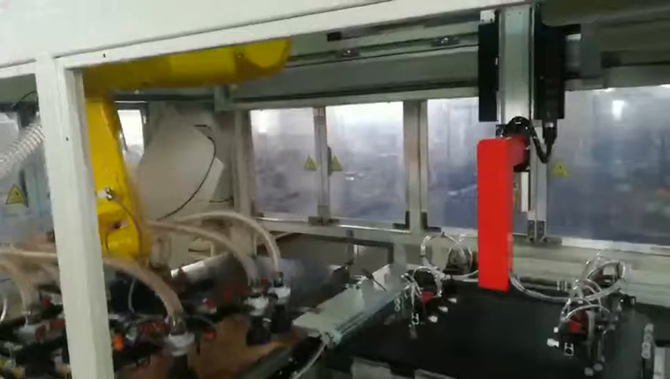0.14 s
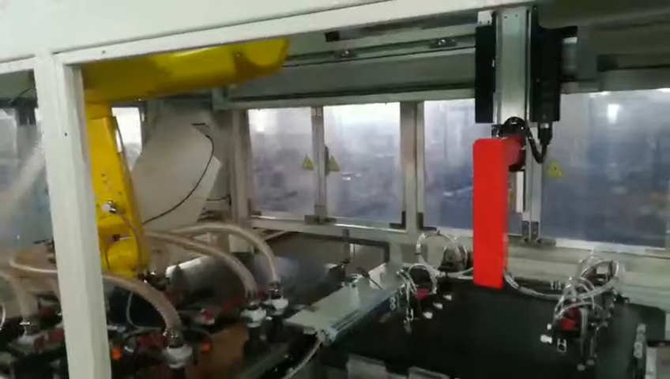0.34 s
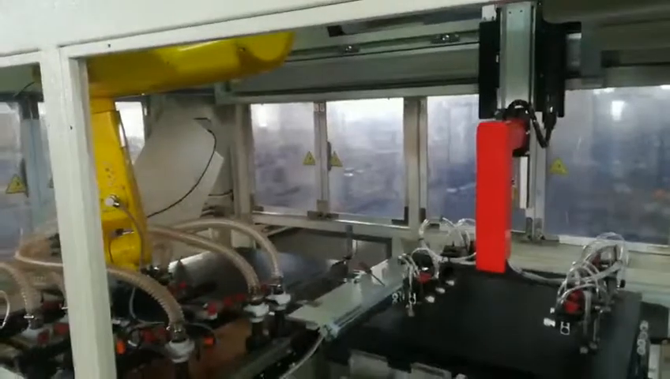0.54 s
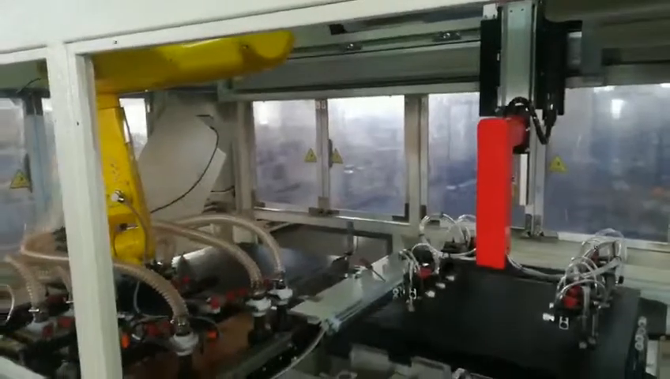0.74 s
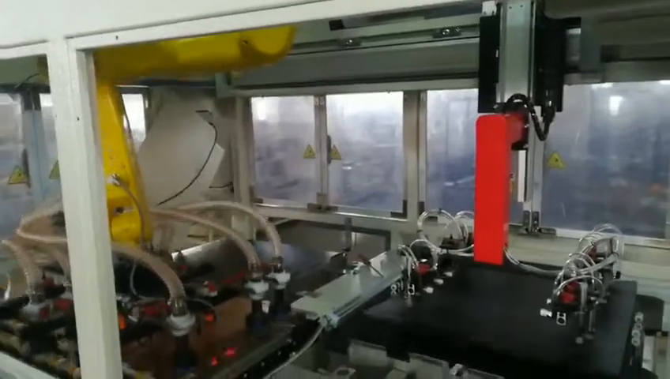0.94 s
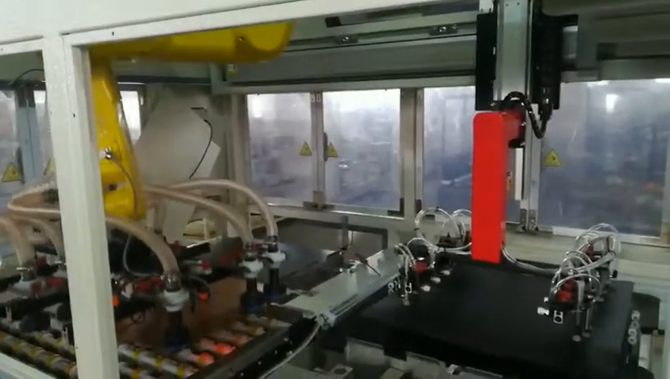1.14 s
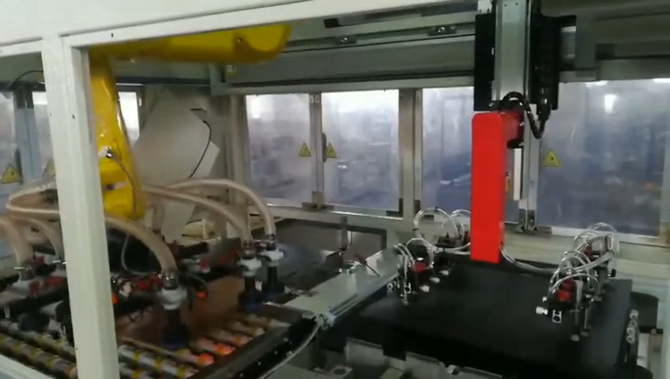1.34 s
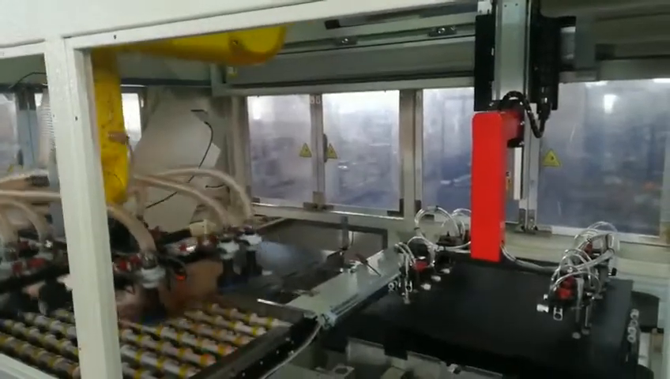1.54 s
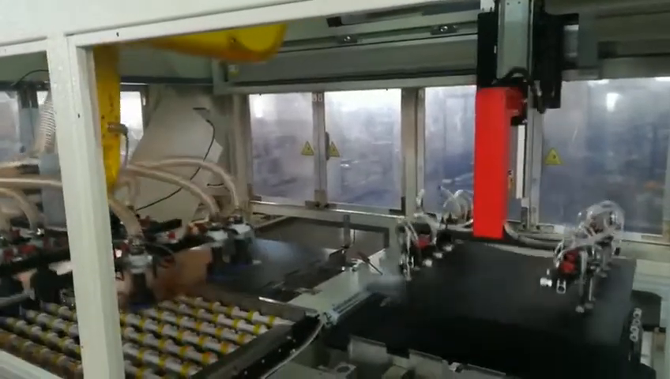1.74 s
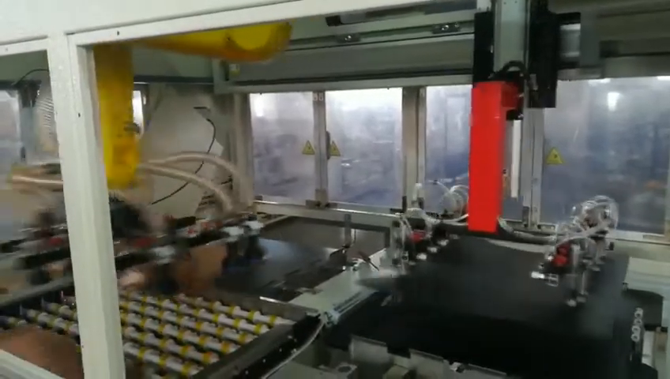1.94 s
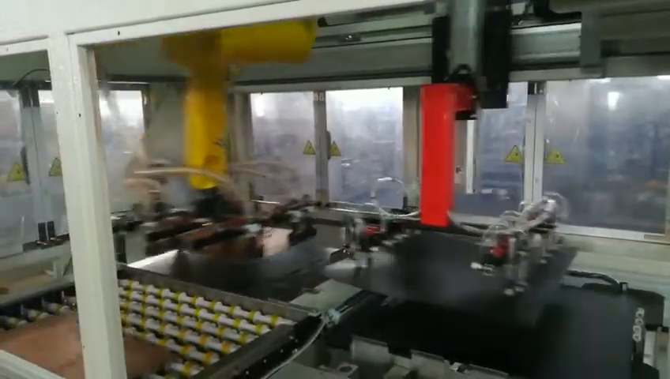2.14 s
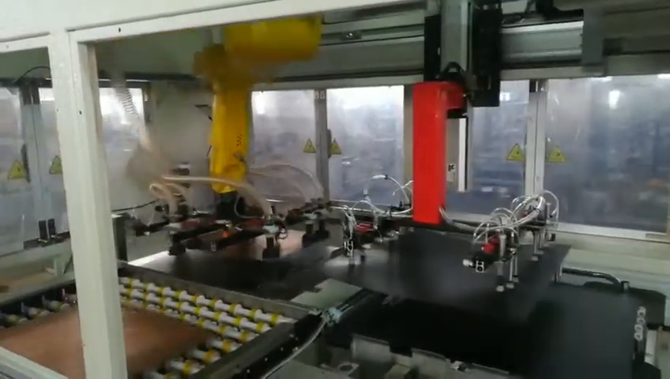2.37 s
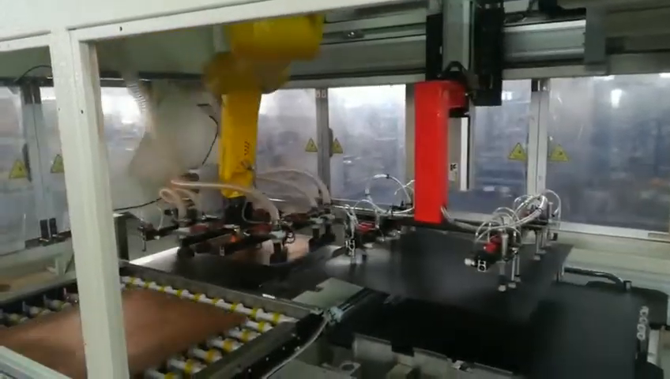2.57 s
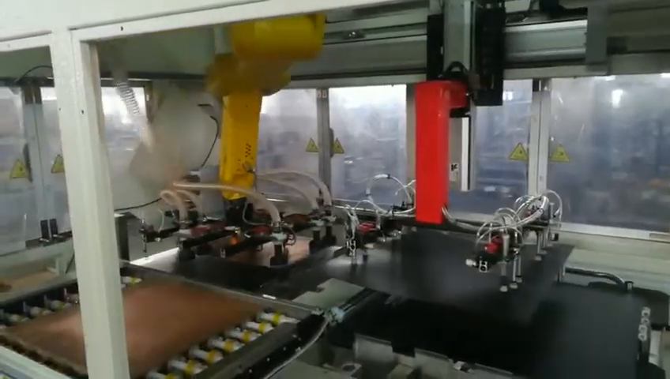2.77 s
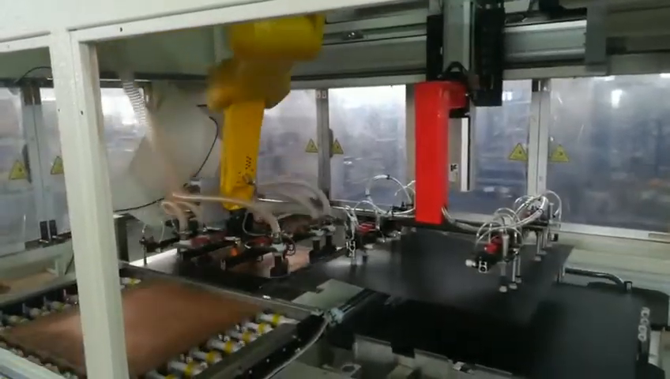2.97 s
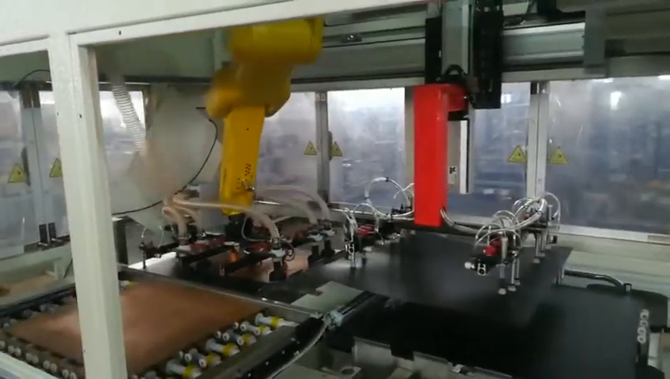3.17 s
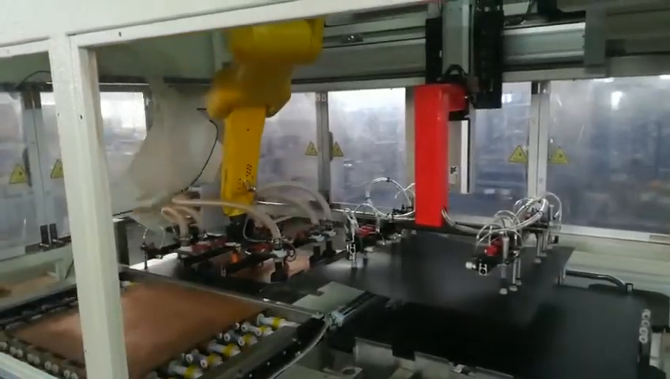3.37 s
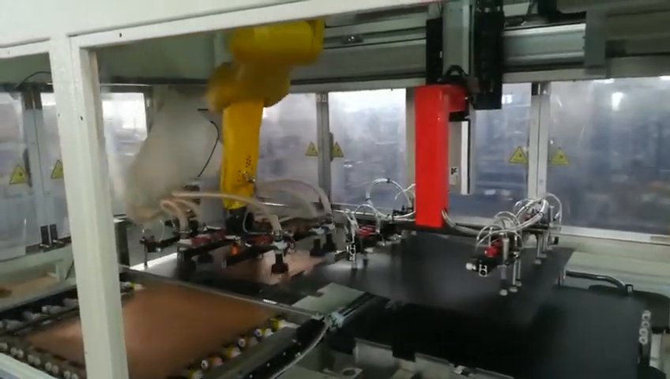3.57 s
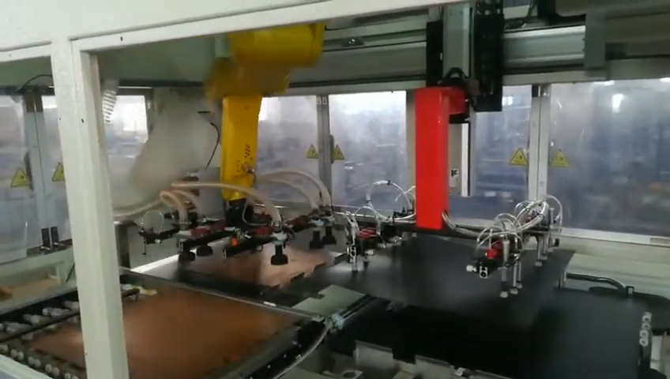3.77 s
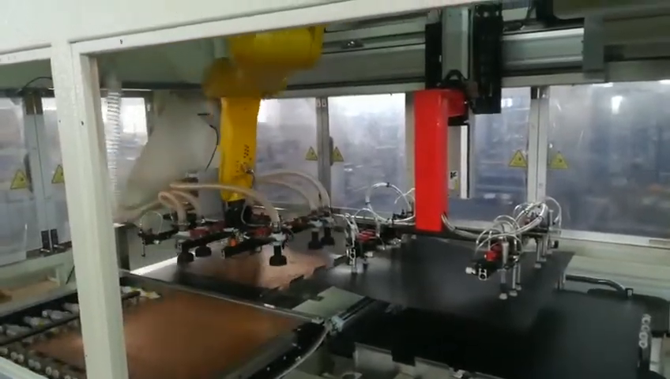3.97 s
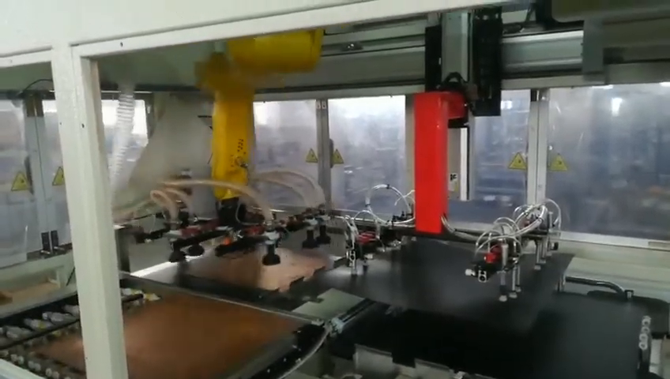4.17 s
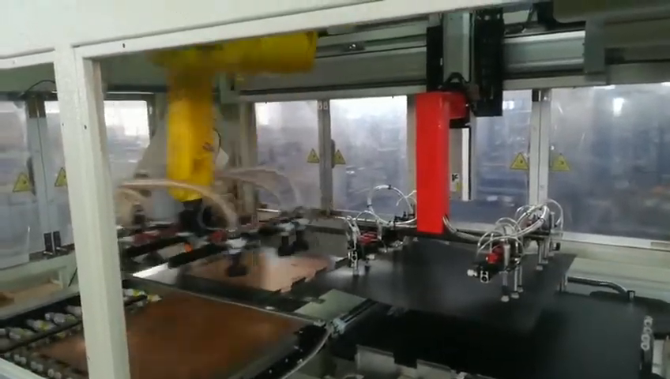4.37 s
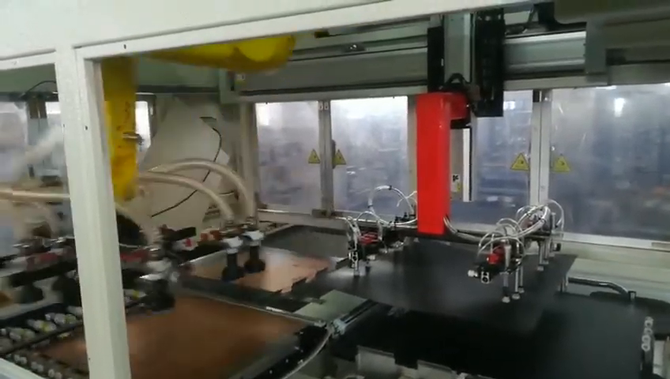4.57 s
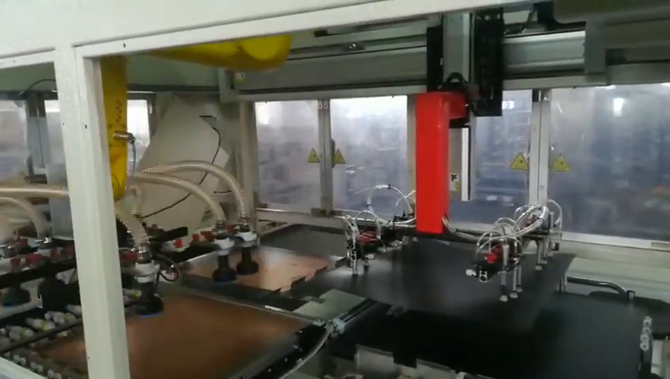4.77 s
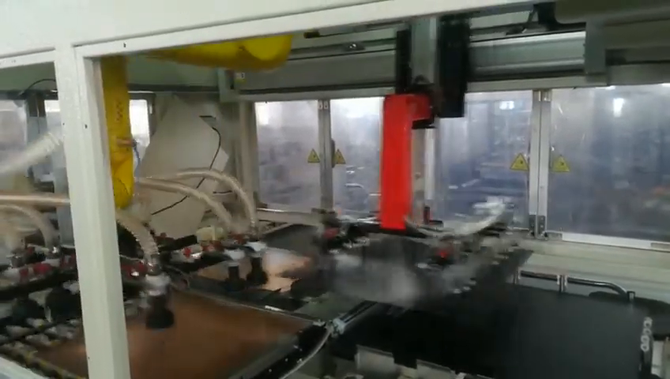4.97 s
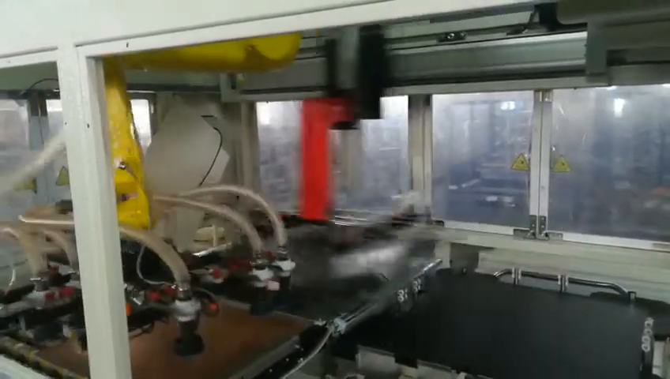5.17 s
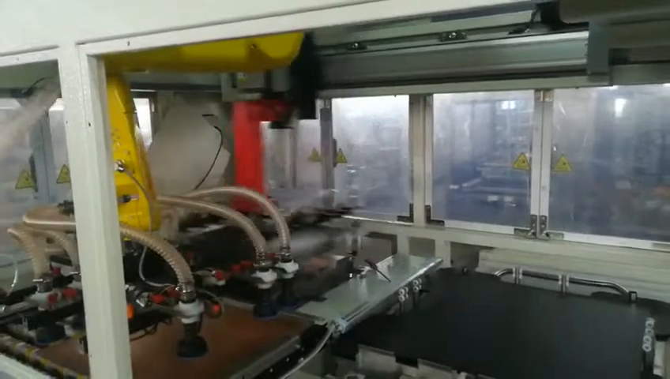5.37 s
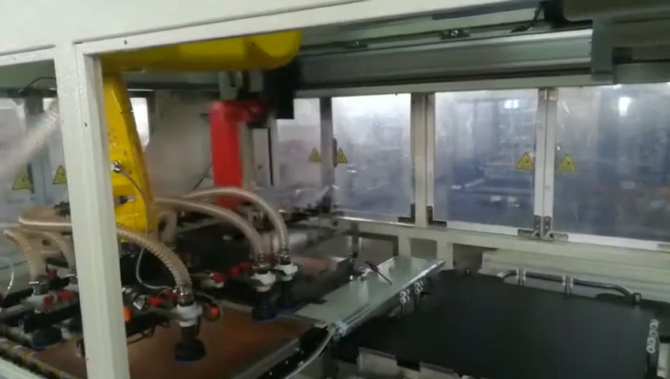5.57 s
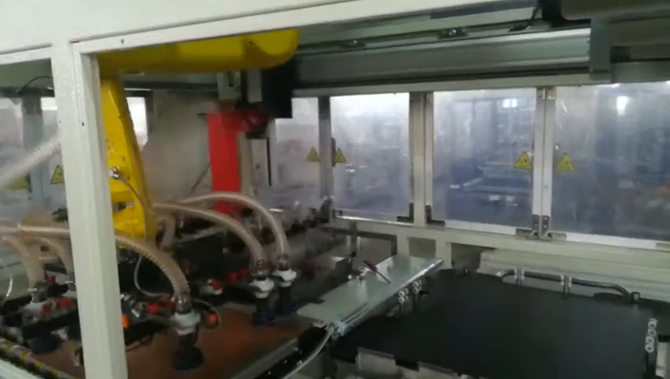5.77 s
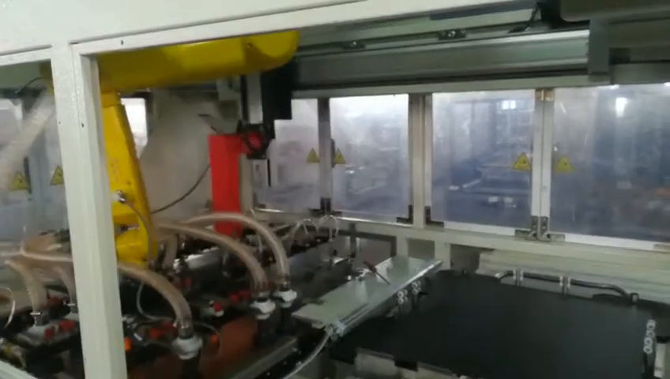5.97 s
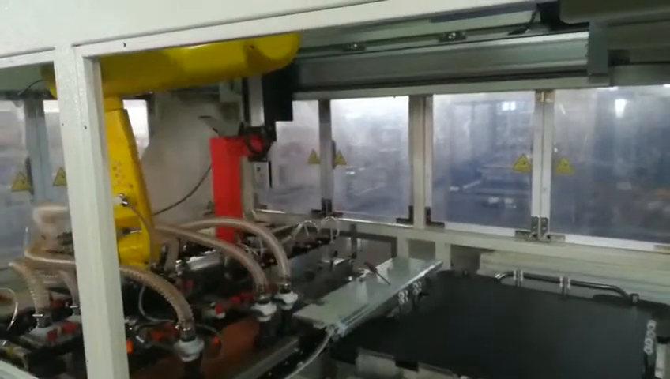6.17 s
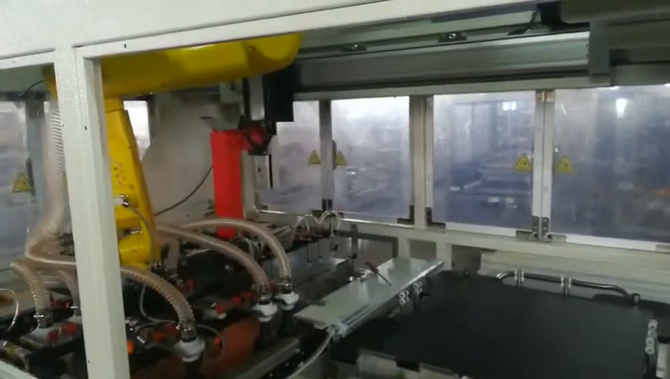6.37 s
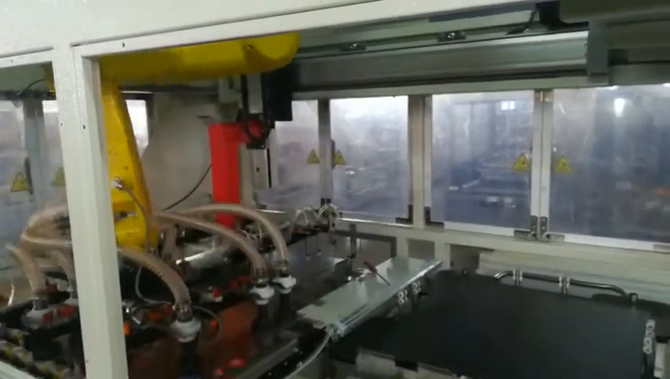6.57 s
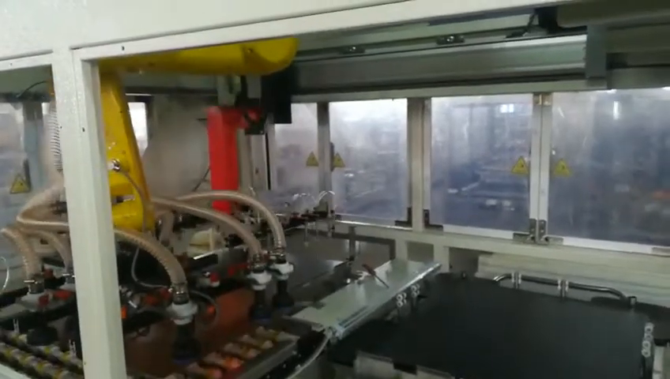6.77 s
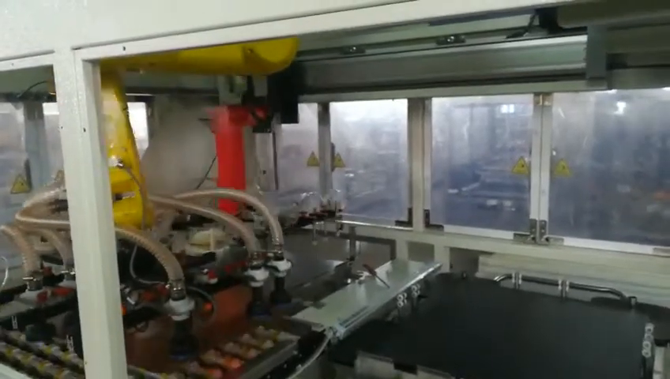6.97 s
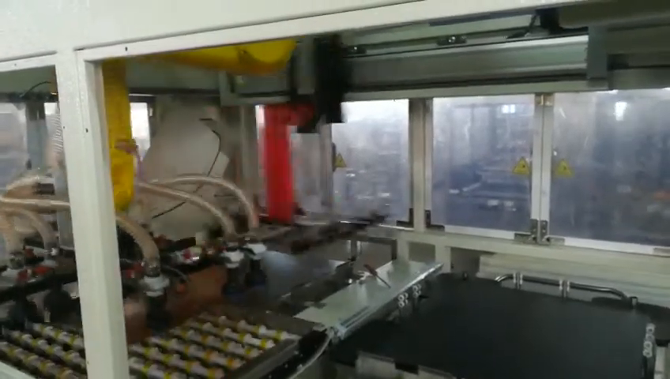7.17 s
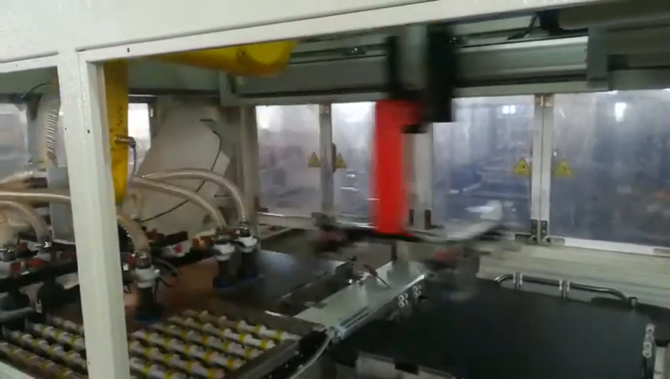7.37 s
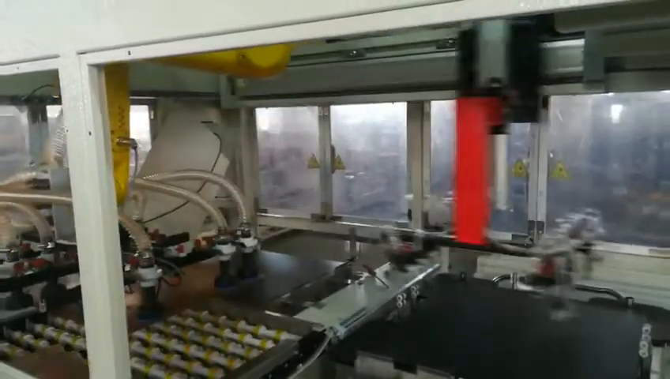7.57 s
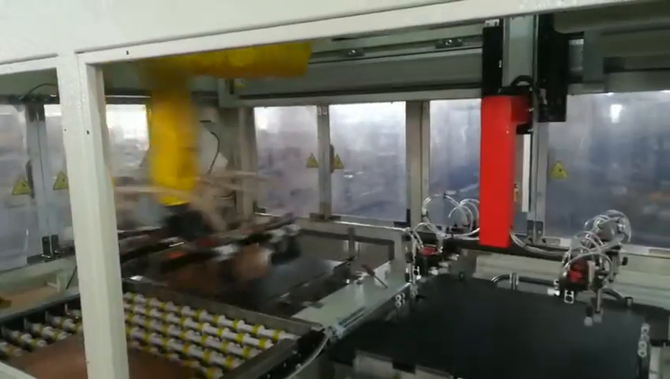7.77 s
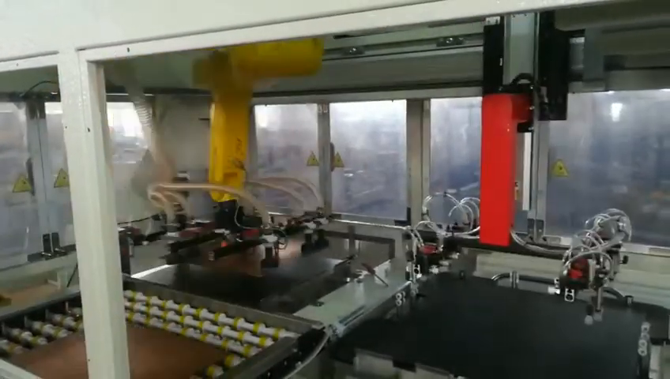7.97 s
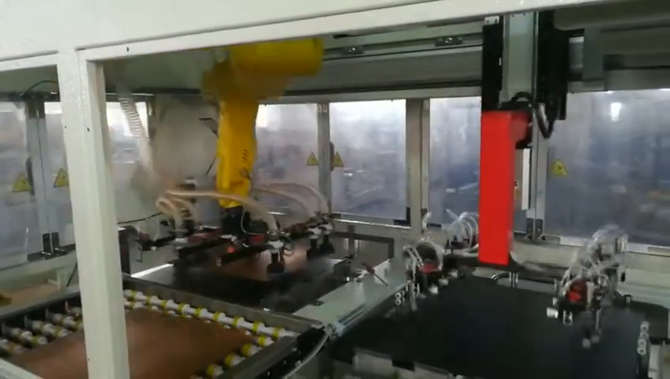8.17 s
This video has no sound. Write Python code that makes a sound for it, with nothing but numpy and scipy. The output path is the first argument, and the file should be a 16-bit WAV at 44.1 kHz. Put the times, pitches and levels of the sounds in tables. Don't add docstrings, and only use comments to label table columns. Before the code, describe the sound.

Steady hall rumble, drive rush and a thin blower whine lie under a robot's vacuum gripper. Open rubber cups fizz and whistle around five kilohertz, stop on sealing, then hoses sputter and lips squeak. A knock and low wobbling boom follow, a servo moves with a rising whir and airy puff, and the whistling suction resumes to the end. Small stereo microphone nearby, slightly uneven left and right.

```python
import sys
import numpy as np
from scipy import signal
from scipy.fft import rfft, irfft, next_fast_len
from scipy.io import wavfile
from scipy.ndimage import uniform_filter1d, map_coordinates

SR = 44100
rng = np.random.default_rng(int(sys.argv[2]) if len(sys.argv) > 2 else 0)


def wav_out(sig):
    wavfile.write(sys.argv[1], SR, np.round(np.clip(np.atleast_2d(sig).T, -1, 1) * 32767).astype(np.int16))


def decibels_to_gain(level_db):
    exponent = np.asarray(level_db, float) / 20
    return 10 ** exponent


N = 362061

# (f/Hz, left minus right/dB)
AIR_SIDE = [(1200, 3), (2200, 2), (3200, -6), (4000, 4.5), (4500, 0), (4950, 7.5), (5500, -3.5),
            (6500, 1.5), (7700, -4), (10000, -6), (13500, -6.5), (15500, -1)]
# (f/Hz, left minus right/dB)
VENT_SIDE = [(350, -0.5), (700, 3), (1500, 2), (2500, 0), (4000, -5)]


def unit(x):
    return x / np.sqrt(np.mean(x ** 2) + 1e-20)


def along(points, hz):
    f, v = np.transpose(points)
    return np.interp(np.log(hz + 1), np.log(f + 1), v)


def curves(rows):
    s, *cols = np.transpose(rows)
    return [np.interp(np.arange(N) / SR, s, c) for c in cols]


def swells(rows):
    out = np.zeros(N + 2 * SR)
    for s, length, height in rows:
        n = round(length * SR)
        out[round((s + 1) * SR) - n // 2:][:n] += height * np.hanning(n)
    return out[SR:SR + N]


def wobble(rate):
    steps = np.arange(0, N + 64, 64)
    knots = rng.standard_normal(int(N * 40 / SR) + 4)
    coarse = map_coordinates(knots, [steps * min(rate, 40) / SR])
    return np.interp(np.arange(N), steps, coarse)


def filtered(x, response):
    n = x.shape[-1]
    m = next_fast_len(n + 4096)
    return irfft(rfft(x, m) * response(np.fft.rfftfreq(m, 1 / SR)), m)[..., :n]


def resonances(modes):
    def response(f):
        total = 0
        for k, (centre, width, db) in enumerate(modes):
            damping = 1j * f * width
            total = total + (-1) ** k * decibels_to_gain(db) * damping / (centre * centre - f * f + damping)
        return total
    return response


def shape(spectrum):
    return lambda f: decibels_to_gain(along(spectrum, f))


def turbulence(patchy_db, comb_db):
    z = signal.stft(rng.standard_normal((2, N)), nperseg=1024)[2]

    def smooth(bins, frames):
        grain = rng.standard_normal(z.shape[1:])
        return unit(uniform_filter1d(uniform_filter1d(grain, bins, 0), frames, 1))

    field_db = patchy_db * smooth(bins=12, frames=5) + comb_db * smooth(bins=2, frames=26)
    return signal.istft(z * decibels_to_gain(field_db), nperseg=1024)[1][:, :N]


def diffuse(pair, response, side):
    # (f/Hz, coherence)
    alike = [(60, .998), (130, .99), (260, .95), (350, .88), (560, .35), (780, .2), (1000, .62),
             (1400, .74), (1900, .3), (3000, .3), (4900, .45), (6000, .2), (12000, .12)]
    n = pair.shape[-1]
    m = next_fast_len(n + 4096)
    f = np.fft.rfftfreq(m, 1 / SR)
    turn = np.arccos(np.clip(along(alike, f), 0, 1)) / 2
    common, opposed = rfft(pair, m) * response(f) * [np.cos(turn), np.sin(turn)]
    balance = decibels_to_gain(along(side, f) * [[.5], [-.5]])
    both = irfft(np.array([common + opposed, common - opposed]) * balance, m)[:, :n]
    return both / np.std(both.mean(0))


def tone(hz, side_db, unsteady):
    phase = 2 * np.pi * np.cumsum(hz + np.zeros(N)) / SR + unsteady * wobble(9)
    drift = np.array([wobble(3.9), wobble(9.4)])
    level_db = side_db * np.array([[.5], [-.5]]) + 3 * unsteady * wobble(7)
    return np.sqrt(2) * decibels_to_gain(level_db) * np.sin(phase + .2 * unsteady * drift)


def pitched(rows, side_db, rough):
    bend = 0.81
    out = np.zeros((2, N))
    luck = rng.standard_normal((len(rows), 4, 24))
    for (s, length, lo, hi, db), knots in zip(rows, luck):
        t = np.arange(round(length * 1.3 * SR)) / SR
        level, phase, *ports = [map_coordinates(k, [t * 90]) for k in knots]
        hz = lo + (hi - lo) * np.clip(t / length, 0, 1) ** bend
        shake = rough * (phase + 0.23 * np.array(ports))
        wave = np.sin(2 * np.pi * np.cumsum(hz) / SR + shake)
        gain = decibels_to_gain(db + 3 + 4 * rough * level) * np.sqrt(np.hanning(len(t)))
        first = round((s - .15 * length) * SR)
        out[:, first:first + len(t)] += gain * wave
    return out * decibels_to_gain(side_db * np.array([[.5], [-.5]]))


def hall():
    # (f/Hz, level per Hz/dB)
    rumble_spectrum = [(13, -39), (22, -2), (54, -0.5), (65, 0), (81, 0), (108, -8), (200, -4.5),
                       (260, -7.5), (440, -120)]
    hum_spectrum = [(71, -6.5), (120, -2), (374, -8), (415, -11), (655, -14.5), (700, -11), (910, -84),
                    (1540, -120)]
    axis_spectrum = [(400, -15), (620, -18.5), (750, -5.5), (1050, -3), (1350, -1.5), (1800, -7),
                     (2500, -7.5), (3300, -9.5), (4900, -14), (5400, -15), (8000, -17), (9200, -22.5),
                     (10500, -57), (15700, -31)]
    # (f/Hz, left minus right/dB)
    axis_side = [(60, 0.0), (110, -3), (200, -1), (380, -2), (700, 5), (1290, 1.5), (2380, -6), (4400, 1),
                 (8120, -2), (15000, 9)]
    # (f/Hz, level/dB, left minus right/dB, unsteadiness)
    drones = [(59.2, -43, 0, .8), (597, -57, 4, .7), (700, -51, 8, .2), (1022, -55, 2, .8),
              (1264, -49.5, 1, .6), (2068, -57, -4, .9)]
    # (middle t/s, length/s, level over rest/dB)
    moves = [(.5, 1, 3.5), (1.8, 0.88, 1.5), (2.75, 0.59, 0.5), (4.3, 1, 3), (4.97, 0.29, 1.5),
             (5.2, 0.88, 4.5), (5.9, 0.8, 1.5), (6.35, 0.6, -3.5), (7.17, 0.57, 3.5), (7.47, 0.73, 3),
             (7.8, 0.7, 0.5)]
    # (middle t/s, length/s, rumble level over rest/dB, hum level over rest/dB)
    shudders = [
        (0.263, .07, 5, 6),
        (0.597, 1, 1.5, 4.5),
        (2.087, 0.82, -6, 4),
        (2.4, 0.62, 3.5, 0),
        (3.38, 0.66, -14, 7.5),
        (3.647, 0.7, 6.5, 3),
        (4.143, 1.5, 4.5, 3.5),
        (4.8, 0.65, 0, 4),
        (5.498, 1.7, 5.5, 2.5),
        (8.2, 0.84, 4.5, -0.5),
    ]
    rumble_db = -41 + swells([(s, length, db) for s, length, db, _ in shudders])
    hum_db = -40 + swells([(s, length, db) for s, length, _, db in shudders])
    axis_db = -34.5 + swells(moves)

    low = diffuse(turbulence(patchy_db=2.0, comb_db=1.8), shape(rumble_spectrum), [(100, 0)])
    low = decibels_to_gain(rumble_db + 0.43 * wobble(8.0)) * low
    hum = decibels_to_gain(hum_db) * diffuse(turbulence(patchy_db=1.25, comb_db=1.0), shape(hum_spectrum), VENT_SIDE)
    drives = diffuse(turbulence(patchy_db=.9, comb_db=2.2), shape(axis_spectrum), axis_side)
    tones = sum(decibels_to_gain(db) * tone(hz, side, unsteady) for hz, db, side, unsteady in drones)
    return low + hum + decibels_to_gain(axis_db) * drives + tones


def blower():
    # (t/s, blade f it settles to/Hz, level/dB)
    loads = [(0, 3022, -40), (.32, 2985, -39), (.6, 2977, -42), (1.05, 2977, -44), (2.2, 2977, -48),
             (2.95, 3025, -55), (3.49, 2880, -39.5), (3.7, 2856, -38.5), (3.975, 3016, -55),
             (4.42, 3016, -43), (4.62, 3018, -47), (4.7, 3017, -42.5), (4.97, 3016, -40.5),
             (5.3, 3017, -42), (5.93, 2973, -50), (6.5, 2972, -45), (7.55, 2970, -43)]
    t = np.arange(N) / SR

    def follow(column, lag_s):
        value = loads[0][column]
        for before, after in zip(loads, loads[1:]):
            lags = np.maximum(t - after[0], 0) / lag_s
            settled = 1 - (1 + lags) * np.exp(-lags)
            value = value + (after[column] - before[column]) * settled
        return value

    hz = follow(1, lag_s=.06)
    db = follow(2, lag_s=.03)
    return decibels_to_gain(db + 1.7) * tone(hz, side_db=-12, unsteady=.18)


def vents():
    # (t/s, length/s, hose level/dB, throat level/dB, pitch climb per s)
    ventings = [
        (0.27, 0.073, -31.5, -26, 0.046),
        (3.25, 0.24, -32.5, -28, 0.22),
        (4.023, 0.21, -30.5, -27.5, 0.086),
        (4.311, .17, -45.5, -30.5, 0.47),
        (5.944, 0.06, -27.5, -23, 0.068),
    ]
    # (f/Hz, width/Hz, level/dB)
    hoses = [
        [(250, 290, 0)],
        [(189, 43, -4), (299, 64, 1), (603, 31, -3)],
        [(292, 47, 8.5), (500, 180, 1.5)],
        [(300, 64, 0)],
        [(330, 69, 0)],
    ]
    # (f/Hz, width/Hz, level/dB)
    throats = [
        [(1030, 500, 6.5), (1800, 490, 4), (3130, 780, 5.5)],
        [(610, 200, -9), (1030, 160, -4.5), (1480, 170, -2), (1800, 120, -1.5), (2490, 360, -10.5)],
        [(1240, 530, -8), (1470, 150, -0.5), (1700, 130, -0.5), (2370, 240, -9.5)],
        [(1810, 160, -1), (1400, 250, -13)],
        [(850, 100, -4), (1270, 440, -5.5), (1890, 820, -7.5), (3300, 780, -5.5)],
    ]
    # (t/s, hose level/dB, throat level/dB)
    gulps = [(.315, 11, 5), (.33, -8, -2), (3.35, 7, 3), (3.41, 4, 3.5), (3.47, 5, 2.5), (3.51, -2, -2),
             (4.08, 2, 1.5), (4.115, -3, -2), (4.15, -2, 0), (4.45, -2, -4), (5.989, 6, -0.5)]
    gulp_s, rise_s, hose_late_s, fall_db_per_s = 0.1, 0.018, 0.037, 200
    out, n = np.zeros((2, N)), SR // 2
    t = np.arange(n) / SR
    gulps_db = [swells([(g[0], gulp_s, g[k]) for g in gulps]) for k in (1, 2)]
    for (s, length, *levels, climb), hose, throat in zip(ventings, hoses, throats):
        first = round(s * SR)
        flaps = decibels_to_gain(2.2 * unit(uniform_filter1d(rng.standard_normal(n), size=130)))
        for db, gulp_db, modes, late in zip(levels, gulps_db, (hose, throat), (hose_late_s, 0)):
            steep = lambda f: resonances(modes)(f) / (1 + (f / 3500) ** 4)
            puffs = diffuse(flaps * rng.standard_normal((2, n)), steep, VENT_SIDE)
            bent = t + climb * t * (t - length) / 2 + .05
            puffs = np.array([np.interp(bent, t, port) for port in puffs])
            rise = np.clip(t / (rise_s + late), 0, 1)
            fall = decibels_to_gain(-fall_db_per_s * np.maximum(t - length - late, 0))
            out[:, first:first + n] += decibels_to_gain(db + gulp_db[first:first + n]) * rise * fall * puffs
    return out


def suction():
    # (t/s, flow level at the cup mouths/dB, shear level in the lines/dB)
    flow = [(.28, -39, -5), (.35, -24.5, 0), (.44, -20.5, 1.5), (.93, -21, -1), (1.4, -23.5, 0),
            (1.62, -22, -3), (1.9, -20.5, -3.5), (2.0, -25.5, 1), (2.98, -26.5, 1), (3.08, -34.5, -1.5),
            (3.33, -47, 0.5), (5.92, -44, -3.5), (6.04, -25.5, -2.5), (6.41, -20.5, -3), (6.49, -25, -1),
            (7.14, -23.5, -1), (7.22, -21, -4), (8.21, -25.5, -2)]
    # (middle t/s, length/s, level/dB)
    surges = [(1.02, 0.084, -8), (1.09, .15, -2), (1.888, .03, -5), (2.07, 0.085, 5), (3.0, 0.045, 6.5),
              (3.75, 0.63, 8.5), (3.99, 0.24, 8), (4.14, 0.24, -8), (4.47, .3, 10), (5.0, 0.28, 8),
              (6.19, 0.29, 4.5), (6.54, .14, 0), (7.41, .12, 2.5), (7.65, 0.14, 1.5), (8.12, .18, -2.5),
              (1.03, .2, -1), (1.7, .25, -1)]
    # (t/s, die-away/s, rush level/dB, fizz over rush/dB)
    valve_air = [
        (.3, 0.025, -19.5, -27),
        (3.015, .02, -42, 3),
        (3.243, 0.048, -23.5, -15),
        (3.264, 0.083, -23.5, -27),
        (3.59, 0.22, -35, -16),
        (3.985, .06, -40, -7),
        (4.45, 0.51, -33, -14),
        (5.07, 0.21, -26.5, -19.5),
        (7.64, 0.19, -30, -12),
    ]
    # (f/Hz, level per Hz/dB)
    rush_spectrum = [(880, -61), (1500, -13), (2800, -6.5), (3150, -10.5), (3790, -13), (4910, -13),
                     (5730, -21), (7000, -24.5), (9100, -59), (15400, -120)]
    fizz_spectrum = [(3290, -31), (5600, 3), (6290, -3), (7000, -2.5), (7790, -1.5), (8530, -9),
                     (9530, -7.5), (10700, -16.5), (12300, -14.5), (14600, -19), (15600, -25)]
    # (f/Hz, width/Hz, level/dB)
    cups = [(4920, 245, -0.5), (5070, 200, -9), (7680, 110, -16)]
    spread = [(4830, 1330, -4.5), (5470, 620, -8)]
    t = np.arange(N) / SR
    flow_db, shear_db = curves(flow)
    whistle_db = flow_db + swells(surges)

    rush_power = decibels_to_gain(-28 + 0.41 * (whistle_db + 20.5) + shear_db) ** 2
    fizz_power = decibels_to_gain(-39.5 + 0.49 * (flow_db + 24.5) + shear_db) ** 2
    for s, fade, rush_db, fizz_over_db in valve_air:
        rise_s = 0.0039 + 0.31 * fade
        puff = np.clip((t - s) / rise_s + 1, 0, 1) * np.exp(-np.maximum(t - s, 0) / fade)
        rush_power = rush_power + (decibels_to_gain(rush_db) * puff) ** 2
        fizz_power = fizz_power + (decibels_to_gain(rush_db + fizz_over_db) * puff) ** 2

    flicker = wobble(22)
    whistle = diffuse(turbulence(patchy_db=.8, comb_db=2), resonances(cups), AIR_SIDE)
    whistle = decibels_to_gain(whistle_db - 3.0 + 0.18 * flicker) * whistle
    spill_db = -30.5 + 0.93 * (whistle_db + 26.5)
    spill_response = lambda f: resonances(spread)(f) ** 2
    spill = decibels_to_gain(spill_db) * diffuse(turbulence(patchy_db=.8, comb_db=2), spill_response, [(5000, 4.6)])
    rush = diffuse(turbulence(patchy_db=1.1, comb_db=2.8), shape(rush_spectrum), AIR_SIDE)
    rush = np.sqrt(rush_power) * decibels_to_gain(-1.5 + 0.29 * flicker) * rush
    fizz = diffuse(turbulence(patchy_db=1.5, comb_db=3.0), shape(fizz_spectrum), AIR_SIDE)
    fizz = np.sqrt(fizz_power) * decibels_to_gain(6.0 + 0.32 * flicker) * fizz
    return whistle + spill + rush + fizz


def valves():
    # (t/s, peak level/dB)
    knocks = [
        (.2975, -7.5),
        (.302, -11),
        (.31, -12),
        (3.8405, -8),
        (3.8505, -15),
        (3.857, -16.5),
    ]
    # (f/Hz, level/dB, 60 dB decay time/s)
    block = [(1050, -4, .035), (1220, -2, .05), (1550, -1, .01), (1900, -2, .016), (2150, -5.5, .02),
             (3150, -11, .03)]
    out, t = np.zeros((2, N)), np.arange(SR // 5) / SR
    onset = 1 - np.exp(-t / .0002)
    for s, db in knocks:
        ring = 0
        luck = rng.standard_normal((len(block), 2, 2, 1))
        for (hz, level, t60), (strength, phase) in zip(block, luck):
            decay = decibels_to_gain(level + .7 * strength - 60 * t / t60)
            ring = ring + decay * np.sin(2 * np.pi * hz * t + .15 * phase)
        first = round(s * SR)
        out[:, first:first + len(t)] += decibels_to_gain(db - 8) * ring * onset
    return out * decibels_to_gain([[1.5], [-1.5]])


def lips():
    # (t/s, length/s, first f/Hz, last f/Hz, level/dB)
    squeals = [(3.255, 0.06, 1800, 1780, -31), (3.26, 0.065, 1007, 1030, -35), (3.3, .06, 1634, 1580, -33),
               (3.32, 0.051, 249, 230, -27.5), (3.32, 0.042, 1140, 1110, -30), (3.33, .05, 993, 1000, -35),
               (3.36, .06, 1456, 1535, -29), (3.365, 0.0456, 326, 340, -27), (3.42, 0.026, 230, 250, -32),
               (3.45, .05, 1770, 1773, -28.5), (3.455, 0.045, 300, 300, -31), (3.495, .055, 240, 220, -28),
               (4.05, .045, 1527, 1504, -28), (4.06, .04, 1640, 1670, -32), (4.068, 0.025, 359, 360, -28),
               (4.092, .078, 327, 310, -29.5), (4.128, 0.06, 1430, 1530, -31), (4.18, 0.032, 300, 290, -32),
               (4.22, 0.066, 1240, 1270, -34), (4.225, 0.059, 1680, 1700, -32),
               (4.322, 0.053, 1862, 1780, -33), (4.39, 0.046, 1810, 1770, -31),
               (4.44, 0.052, 1900, 1926, -35), (4.35, .035, 2150, 2400, -29), (4.39, .04, 2250, 2200, -37),
               (4.4, .03, 2700, 2900, -37), (5.972, 0.036, 330, 378, -33), (6.02, 0.043, 410, 350, -35),
               (3.5, 0.043, 1430, 1380, -38), (4.28, .05, 1680, 1760, -35), (4.42, .06, 2900, 3150, -33),
               (4.11, 0.041, 1020, 1055, -34), (5.025, 0.034, 2900, 3080, -31),
               (5.22, .025, 2540, 2520, -36), (4.09, 0.082, 1990, 2060, -37), (4.2, .06, 2050, 2020, -38)]
    # (t/s, length/s, first f/Hz, last f/Hz, level/dB)
    rims = [(.35, .18, 5000, 5060, -27), (.5, 0.16, 5000, 5000, -24.5), (.66, .18, 5025, 5020, -28.5),
            (.4, .12, 4830, 4850, -30), (.7, 0.16, 4850, 4880, -29), (1.06, .11, 5040, 5000, -31),
            (1.44, 0.086, 5070, 5030, -29), (1.58, .05, 4980, 4950, -24), (2.05, .12, 5000, 4980, -31),
            (2.76, .19, 4934, 4930, -34), (6.04, .06, 5050, 5030, -25.5), (6.22, 0.11, 5190, 5150, -25.5),
            (6.2, 0.21, 4780, 4700, -28), (7.19, .1, 4960, 5000, -30), (7.35, .1, 4900, 5000, -32),
            (7.5, .07, 4900, 4940, -27), (7.48, .06, 5600, 5600, -34), (7.88, .16, 4930, 4910, -27.5),
            (8.05, .11, 4930, 4920, -33), (.305, .04, 5000, 4960, -29), (6.3, .08, 4650, 4620, -28),
            (.352, .006, 4800, 5000, -21), (1.8955, .0045, 5050, 4950, -15.5),
            (1.9018, .004, 4930, 4950, -19), (1.92, .004, 4900, 4950, -20), (7.635, .035, 4800, 4900, -23),
            (6.048, 0.0078, 4830, 4950, -25), (6.06, .009, 5000, 4940, -30)]
    return pitched(squeals, side_db=1.5, rough=0.54) + pitched(rims, side_db=12.5, rough=0.35)


def leaks():
    # (middle t/s, length/s, f/Hz, width/Hz, level/dB)
    gaps = [(0.54, 0.53, 4770, 390, -32), (.8, .3, 3250, 1900, -28.5), (7.65, 0.37, 5400, 490, -33),
            (4.46, .14, 5400, 2100, -36), (3.38, .2, 440, 280, -40), (4.15, .2, 496, 240, -38),
            (1.11, .06, 2420, 100, -37), (1.35, .1, 2350, 120, -36), (1.6, 0.077, 2700, 100, -42),
            (2.8, 0.14, 2670, 100, -35), (1.43, .07, 3000, 300, -33), (1.989, 0.31, 1870, 960, -33.5),
            (2.7, 0.63, 11700, 1100, -46), (2.746, 0.12, 1700, 850, -31), (2.983, .05, 4900, 980, -26.5),
            (3.02, .03, 5800, 910, -31), (3.192, 0.063, 4200, 3600, -31.5), (3.254, 0.052, 5600, 2900, -30),
            (3.784, 0.44, 7100, 900, -44), (4.34, 0.16, 7400, 560, -41.5), (4.41, 0.1, 7200, 900, -38),
            (4.505, 0.05, 5900, 700, -32.5), (4.5, 0.095, 4950, 400, -39), (4.46, .08, 3200, 250, -34.5),
            (4.457, 0.066, 6300, 490, -31.5), (4.555, 0.092, 7560, 810, -33), (5.09, 0.09, 3250, 300, -36),
            (6.13, .12, 5150, 600, -28), (6.19, .3, 3100, 1100, -36), (5.99, 0.0405, 4730, 400, -30),
            (6.245, .25, 6900, 1500, -38), (6.258, 0.3, 5400, 580, -33), (6.296, .18, 4700, 370, -30),
            (7.02, 0.07, 3060, 300, -36), (7.665, 0.053, 5900, 2500, -37), (7.783, 0.33, 1780, 510, -34.5)]
    # (middle t/s, length/s,
    # f/Hz, width/Hz, level/dB)
    more_swells = [
        (1.15, 0.23, 4910, 130, -31),
        (1.545, 0.034, 420, 120, -39),
        (1.7, 0.27, 4400, 120, -41),
        (2.35, 0.32, 4980, 110, -29.5),
        (2.75, 0.39, 4945, 100, -27),
        (6.8, .4, 5090, 300, -30),
        (7.7, .3, 5080, 200, -29),
        (5.65, .45, 4950, 300, -43.5),
        (4.65, .2, 4900, 300, -41),
    ]
    out = np.zeros((2, N))
    for s, length, hz, width, db in gaps + more_swells:
        n = round(length * 1.6 * SR)
        twice = lambda f: resonances([(hz, width, 0)])(f) ** 2
        air = diffuse(rng.standard_normal((2, SR // 4)), twice, AIR_SIDE)
        first = round(s * SR) - n // 2
        out[:, first:first + n] += decibels_to_gain(db) * np.hanning(n) * np.tile(air, 8)[:, :n]
    return out


def sheet():
    # (middle t/s, length/s, level/dB, f/Hz)
    booms = [
        (3.626, .17, -25.5, 97.8),
        (3.709, 0.21, -29, 83),
        (3.842, .09, -24.5, 80),
        (3.913, 0.082, -25.5, 65.3),
        (3.995, 0.04, -24.5, 81),
    ]
    hz, = curves([(s, hz) for s, _, _, hz in booms])
    gain = swells([(s, length, decibels_to_gain(db)) for s, length, db, _ in booms])
    return gain * tone(hz * (1 + 0.068 * wobble(29.97)), side_db=1.5, unsteady=0.33)


def servos():
    # (t/s, length/s, first f/Hz, last f/Hz, level/dB)
    sweeps = [(5.0, .04, 900, 800, -41), (5.045, 0.055, 745, 760, -37.5), (5.085, .05, 850, 907, -36),
              (5.135, 0.05, 917, 940, -34), (5.19, .055, 930, 975, -37), (5.27, .045, 747, 773, -37),
              (5.26, 0.067, 1196, 1210, -40), (7.075, 0.061, 760, 740, -39.5), (7.14, .035, 850, 920, -39),
              (7.17, 0.033, 835, 840, -38), (7.175, 0.033, 950, 970, -39)]
    return pitched(sweeps, side_db=7, rough=.75)


def scene():
    return hall() + blower() + vents() + suction() + valves() + lips() + leaks() + sheet() + servos()


def low_pass(x):
    return signal.sosfilt(signal.butter(12, 15760, fs=SR, output="sos"), x)


def record(dry):
    # (f/Hz, left lead/rad)
    lead = [(30, .03), (130, 0.076), (400, 0.59), (620, 2.4), (900, 0.12), (1600, 1.2), (2500, 1.66),
            (3200, 5.4), (5000, 8.09), (15000, 21.9)]
    ports = filtered(dry, lambda f: np.exp(.5j * along(lead, f) * [[1], [-1]]))
    since = np.arange(N) / SR - 0.245
    gain = (since >= 0) * decibels_to_gain(-3 * np.exp(-np.abs(since) / 0.08))
    return low_pass(ports * gain)


dry = scene()
out = record(dry)
wav_out(out)
```